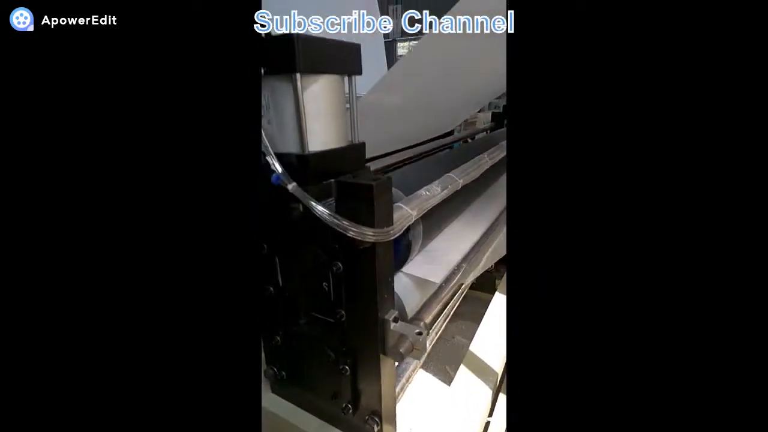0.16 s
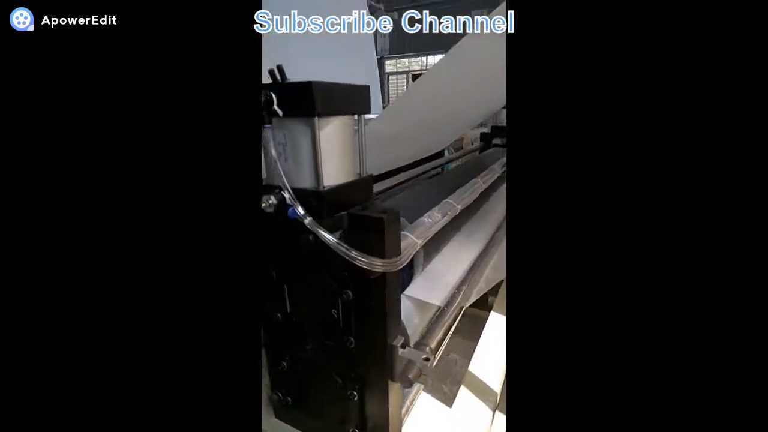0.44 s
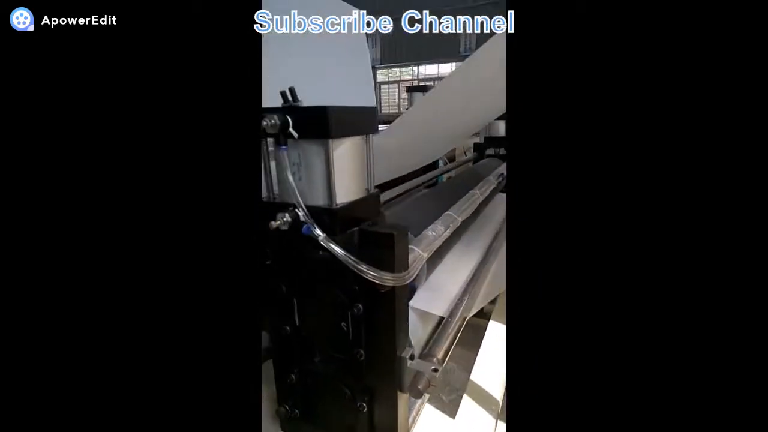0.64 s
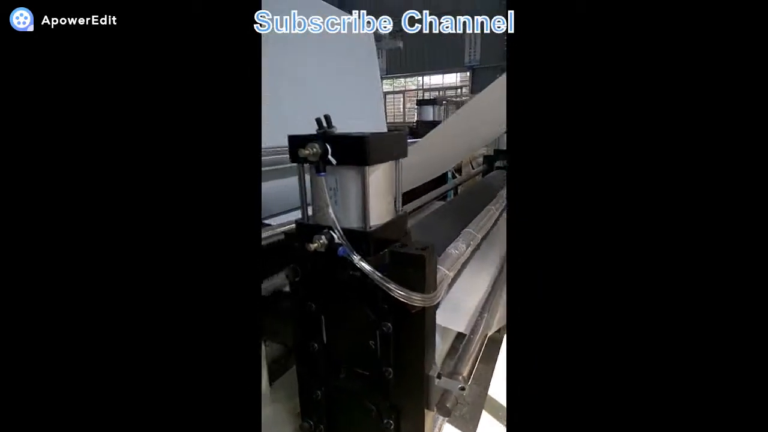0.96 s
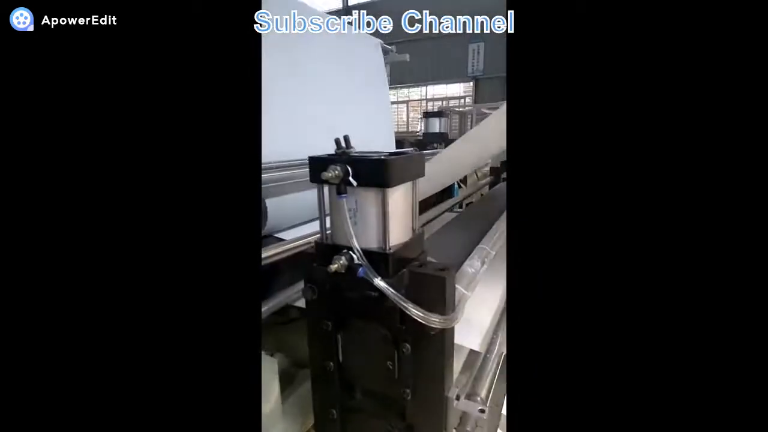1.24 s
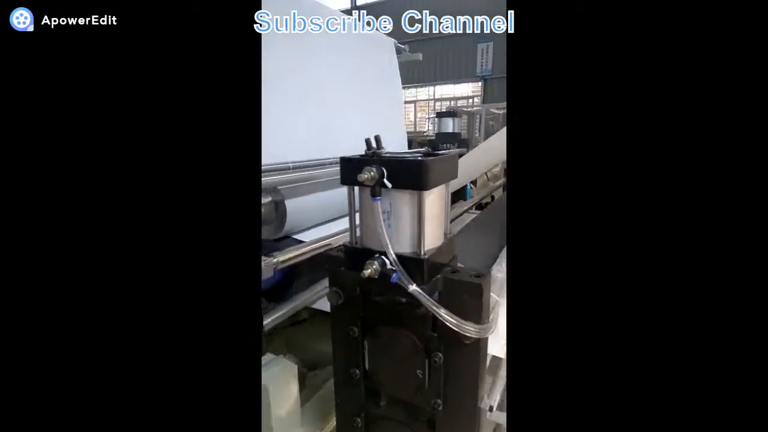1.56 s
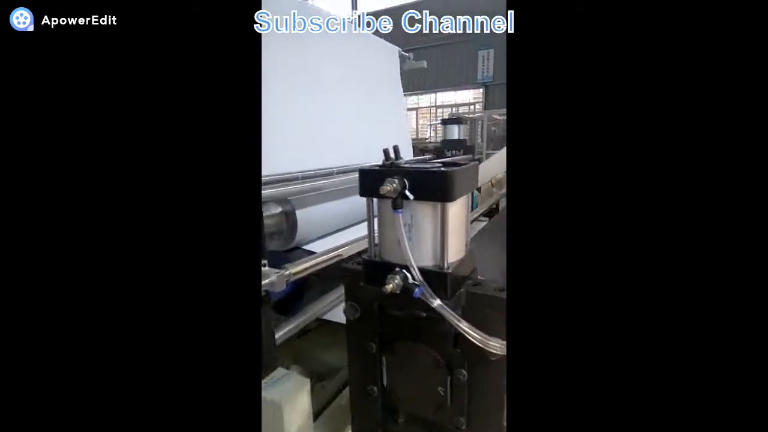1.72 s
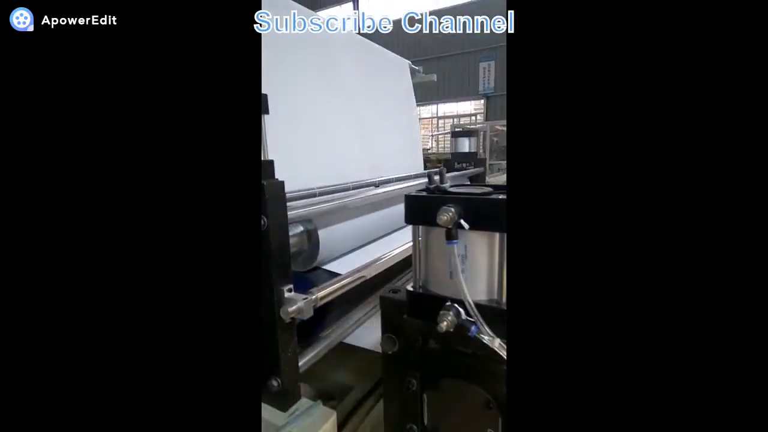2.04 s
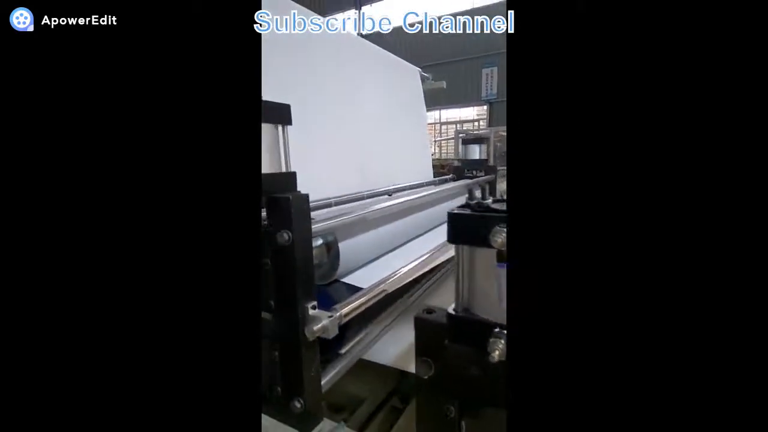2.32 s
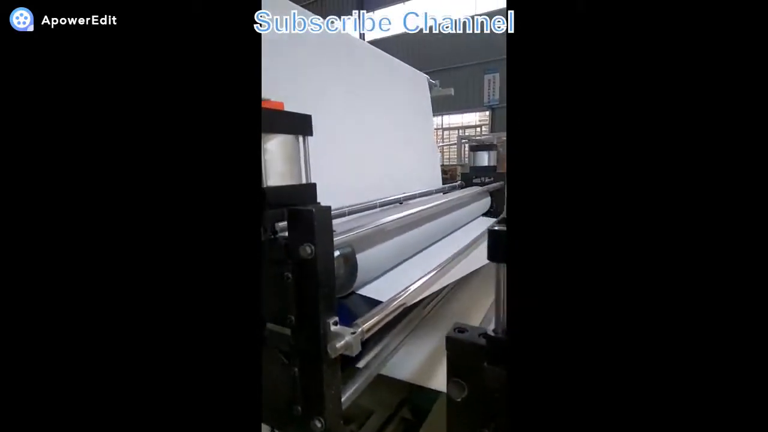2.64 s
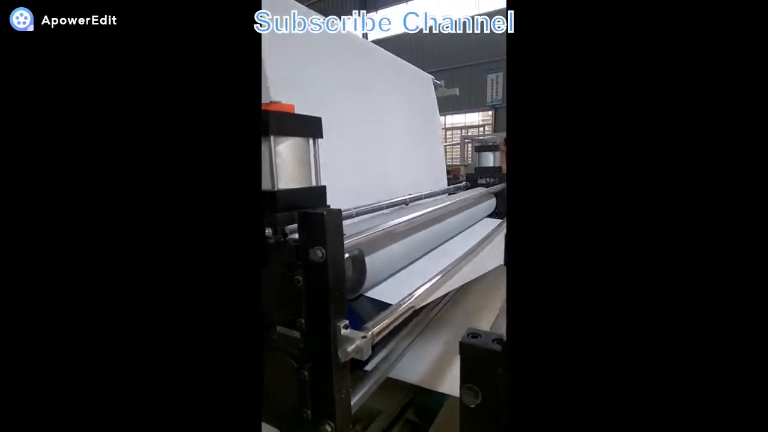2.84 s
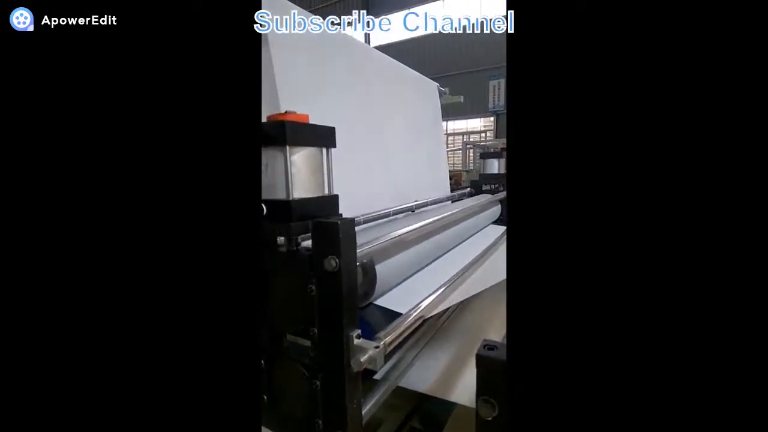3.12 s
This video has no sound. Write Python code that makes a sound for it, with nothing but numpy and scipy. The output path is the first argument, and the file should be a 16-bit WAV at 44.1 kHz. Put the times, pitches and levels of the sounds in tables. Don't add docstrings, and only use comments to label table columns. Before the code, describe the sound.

A tissue folding machine hammers out fast, even metallic clacks amid humming, rustling factory noise.

```python
import sys
import numpy as np
from scipy import signal
from scipy.io import wavfile
from scipy.ndimage import uniform_filter1d

SR = 44100
rng = np.random.default_rng(int(sys.argv[2]) if len(sys.argv) > 2 else 0)


def ratio(d):
    e = np.asarray(d, float) / 20
    return 10 ** e


def pcm_store(signal):
    levels = np.round(np.clip(np.atleast_2d(signal), -1, 1) * 32767)
    wavfile.write(sys.argv[1], SR, levels.astype(np.int16).T)


N = 144648

# frequency in Hz, level in dB per Hz.
RUMBLE_SPECTRUM = [(20, -25), (35, -4), (50, 2), (70, -3), (105, 27), (120, -34), (145, -41), (200, -46)]
# frequency in Hz, level in dB per Hz.
ROAR_SPECTRUM = [(140, 0.5), (180, -3), (255, 0), (310, -3.5), (370, -1.5), (520, -5), (660, -5),
                 (860, -9.5), (1400, -14)]
# time in seconds, gain in dB.
ROAR_WALK = [(0, 1.5), (.3, 2.1), (.8, 0.7), (1.3, 0.3), (1.6, -0.4), (2.0, 0.1), (2.5, 0), (2.9, -0.1),
             (3.28, 0.9)]
# frequency in Hz, likeness (1 is identical).
EAR_LIKENESS = [(60, 1), (180, 1.0), (550, 0.66), (1650, 0.022), (4970, 0.033), (15000, 0.4)]
# frequency in Hz, level in dB per Hz.
RUSTLE_SPECTRUM = [(1100, -7.5), (1400, -11.5), (2080, -2), (3650, -10.5), (7500, -9), (9500, -16.5),
                   (12000, -16.5), (15800, -26.5)]
# time in seconds, level in dB.
HUM_WALK = [(0, -12), (.15, -11.5), (.4, -11), (1.3, -9.5), (1.9, -9), (2.6, -9), (3.28, -9)]
# multiple of the shaft speed, level in dB against the hum, waver in dB.
BLOWER_ORDERS = [(1, -19, 1.5), (2, 0, .35), (4, -30, 3.0), (6, -35, 3.0), (7, -25, 2.5), (9, -27, 3.0),
                 (10.0, -32, 3.0)]
# frequency in Hz, level in dB, waver in dB.
MOTOR_TONES = [(80.2, -36, 3.0), (99.4, -30, 3.5), (182, -37, 5.0), (365, -41, 5.0), (520, -45, 5.0)]
# frequency in Hz, level in dB, waver in dB.
WHINE_LINES = [(7892.3, -44, 2.0), (7962.7, -45, 2.0), (8036.6, -49, 2.0), (8110, -49, 2.0)]
# time in seconds, gain in dB.
WHINE_WALK = [(0, -3), (.2, -4), (.3, 2.5), (1.3, 2.5), (1.7, 1), (1.9, -2), (2.2, .5), (2.45, -1),
              (2.6, 2.5), (2.95, 2.5), (3.05, -2), (3.28, -3)]
# time in seconds, level in dB.
GEAR_WALK = [(0, -38.5), (.9, -41.5), (1.15, -35), (1.3, -38.5), (1.8, -40), (1.97, -28.5), (2.2, -33.5),
             (2.4, -53), (3.28, -38)]
# frequency in Hz, level in dB per Hz.
PUFF_SPECTRUM = [(590, -44), (1000, -7), (1100, -9), (1420, -7.5), (5250, -3), (7340, -2), (12400, -14.5),
                 (16000, -21)]
# time in seconds, level in dB.
VALVE_FLOW = [
    (2.79, -41),
    (2.808, -21),
    (2.825, -16),
    (2.842, -15),
    (2.852, -16.5),
    (2.885, -19.5),
    (2.91, -19),
    (2.97, -27),
    (3.05, -34),
]
# frequency in Hz, level in dB per Hz.
STRIKE_SPECTRUM = [(600, -18.5), (1300, -6), (1800, 3.5), (3000, -3.5), (5500, -3.5), (7200, -5.5),
                   (12000, -15.5), (15000, -18.5)]
# ring in Hz, second ring in Hz, rebound in dB.
TUCKERS = [
    (2200, 2090, -1),
    (2400, 2280, 2),
    (2250, 2400, -.5),
]
# delay in seconds, crack in dB, ring in dB, time for the crack to fall 60 dB in seconds.
TUCK_HITS = [
    (0, -6, 0.5, .04),
    (.0105, -6, -.5, .05),
    (.047, -13, -8, .04),
]
# time in seconds, strength in dB, ring in dB.
TUCK_TIMES = [(0.0024, -15, -17), (0.1434, -21.5, -17), (0.2834, -14.5, -22), (0.4222, -16, -41),
              (0.565, -27, -22), (0.707, -11.5, -41), (0.8474, -14, -18), (0.9894, -17.5, -18),
              (1.1282, -17, -22), (1.2704, -14, -12), (1.4102, -23, -19), (1.5517, -12, -20),
              (1.6934, -11.5, -16), (1.8329, -23, -18), (1.972, -14.5, -16), (2.1154, -14, -17),
              (2.2546, -17, -19.5), (2.3954, -11.5, -19), (2.5384, -10, -16), (2.6789, -16.5, -15),
              (2.819, -31, -29), (2.961, -16, -15.5), (3.1001, -20.5, -16.5), (3.2406, -14.5, -22)]
# ring in Hz, second ring in Hz, rebound in dB.
ROLL_BLADES = [
    (1720, 1950, -3),
    (2030, 1880, -1),
    (1760, 2030, -2.5),
]
# delay in seconds, crack in dB, ring in dB, time for the crack to fall 60 dB in seconds.
CUT_HITS = [
    (0, 1.5, -4, .04),
    (.0055, -1.5, 0.1, .035),
    (.0205, -3, -1, .035),
]
# time in seconds, strength in dB, ring in dB, treble in dB.
CUT_TIMES = [(0.0653, -15.5, -33, 0.5), (0.2072, -13, -13, -2), (0.3474, -15.5, -15, 5),
             (0.4878, -13, -19, -1.5), (0.6313, -13, -13, 1.5), (0.7706, -12.5, -15, 1),
             (0.9115, -13, -18, 2.5), (1.0542, -11.5, -12.5, -2), (1.1912, -12.5, -17, 0.5),
             (1.3324, -9.5, -20, -2), (1.476, -12, -13.5, 0.1), (1.6156, -10, -18.5, 0.5),
             (1.7554, -10.5, -21, -1), (1.8969, -9.5, -13, 1.5), (2.0379, -12, -11, 0.5),
             (2.1789, -10, -32, 0.8), (2.3215, -8, -13.5, -1.5), (2.4611, -10.5, -16, 1.5),
             (2.601, -7.5, -31, 0.1), (2.7441, -9.5, -17.5, 1.5), (2.8864, -12, -14.5, -1),
             (3.0245, -8, -34, 1.3), (3.1653, -10, -17, 2)]
# frequency in Hz, threshold in dB against the usual power.
MUTE_LEVELS = [(3000, -14), (6000, -6), (7500, -3.2), (8600, -1), (10000, .2), (13000, -.3), (15000, .5),
               (16000, 2)]


def evened(x):
    return x / np.sqrt(np.mean(x ** 2) + 1e-20)


def read(points, hz):
    f, value = np.transpose(points)
    return np.interp(np.log(hz + 1), np.log(f + 1), value)


def curve(points):
    return np.interp(np.arange(N) / SR, *np.transpose(points))


def drift(rate):
    f = np.geomspace(rate / 12, rate, 20)[:, None]
    t = np.arange(0, N + 256, 256) / SR
    waves = np.sin(2 * np.pi * (f * t + rng.random((20, 1)))) / np.sqrt(f)
    return np.interp(np.arange(N) / SR, t, evened(waves.sum(0)))


def colour(x, points):
    hz = abs(np.fft.fftfreq(4096, 1 / SR))
    log_gain = np.log(ratio(np.maximum(read(points, hz), -80)))
    phase = -signal.hilbert(log_gain).imag
    taps = np.fft.ifft(np.exp(log_gain + 1j * phase)).real[:2048]
    return signal.oaconvolve(x, taps[None] / np.linalg.norm(taps), axes=1)[:, :x.shape[1]]


def noise(points, patchy_db, below_db=-40, above_db=-40):
    frames, hz = N // 256 + 5, np.fft.rfftfreq(2048, 1 / SR)
    a, b, c, d, patches = rng.standard_normal((frames // 2, 1025, 5)).T
    patches = uniform_filter1d(patches, size=16, axis=0)
    patches = evened(uniform_filter1d(patches, size=5, axis=1))
    same = np.clip(read(EAR_LIKENESS, hz), -1, 1)[:, None]
    left = a + 1j * b
    right = same * left + np.sqrt(1 - same ** 2) * (c + 1j * d)
    low_hz, high_hz = points[0][0], points[-1][0]
    skirt_db = below_db * np.log2(np.maximum(low_hz / (hz + 1), 1))
    skirt_db = skirt_db + above_db * np.log2(np.maximum(hz / high_hz, 1))
    level_db = (read(points, hz) + skirt_db)[:, None] + patchy_db * patches
    z = np.array([left, right]) * ratio(level_db)
    return evened(signal.istft(z, nperseg=2048, noverlap=1536)[1][:, :N])


def tone(hz, db, waver_db, rate, lead):
    turn = 2 * np.pi * (hz * np.arange(N) / SR + rng.random())
    return np.sqrt(2) * ratio(db + waver_db * drift(rate)) * np.sin([turn - lead, turn + lead])


def hall_roar():
    roar = ratio(-22 + curve(ROAR_WALK)) * noise(ROAR_SPECTRUM, 1.08, below_db=-41, above_db=-12)
    return roar + ratio(-26.5) * noise(RUMBLE_SPECTRUM, 3.9)


def paper_rustle():
    cycle_s, slack_s, slack_width_s, slack_db = .14091, .113, .018, -3.5
    off = (np.arange(N) / SR - slack_s + cycle_s / 2) % cycle_s - cycle_s / 2
    level_db = -24 + slack_db * np.exp(-(off / slack_width_s) ** 2)
    return ratio(level_db) * noise(RUSTLE_SPECTRUM, 2.7, below_db=-68)


def blower():
    shaft_hz = 62.95
    hum = sum(tone(k * shaft_hz, db, waver, 6.0, -.024 * k) for k, db, waver in BLOWER_ORDERS)
    return hum * ratio(curve(HUM_WALK)) * ratio([[-.4], [.4]])


def motors():
    low = sum(tone(hz, db, waver, 4.87, .015) for hz, db, waver in MOTOR_TONES)
    gear = tone(658, 0, 5.3, 14.0, .1) * ratio(curve(GEAR_WALK))
    whine = sum(tone(hz, db + 1.8, waver + 1.8, 45.0, .45) for hz, db, waver in WHINE_LINES)
    whine = whine * ratio(curve(WHINE_WALK) + [[1.2], [-1.2]])
    return whine + gear + low


def valve_puff():
    sputter_db = 1 * drift(220.0)
    return ratio(curve(VALVE_FLOW) + sputter_db) * noise(PUFF_SPECTRUM, 1.5, below_db=-7)


def blows(events, parts, contacts, rise_s, t60, ring_t60, crack_db, ring_db, body_db):
    t, out = np.arange(5000) / SR, np.zeros((2, N + 5000))
    repeat_share = .3
    own = rng.standard_normal((len(parts), 2, len(t)))
    treble = signal.butter(2, 4630, "high", fs=SR)
    dull = signal.butter(2, 5000, fs=SR)
    for k, (s, db, knock_db, *treble_db) in enumerate(events):
        part = k % len(parts)
        hz, second_hz, rebound_db = parts[part]
        r, fresh = rng.standard_normal(4), rng.standard_normal((2, len(t)))
        grit = np.sqrt(repeat_share) * own[part] + np.sqrt(1 - repeat_share) * fresh
        side = np.array([[0], [1.37 + r[2]]])
        crack = grit * np.minimum(t / .012, 1) * ratio(body_db - 60 * t / t60)
        ring = 0
        for n, (delay_s, hit_db, tone_db, snap_t60) in enumerate(contacts):
            u = np.maximum(t - delay_s * (1 + 0.0435 * r[0]), 0)
            rise = np.minimum(u / rise_s, 1) * ratio((n > 0) * (rebound_db + 1.5 * r[1]))
            snap = grit * rise * ratio(hit_db - 60 * u / snap_t60)
            if n == len(contacts) - 1:
                snap = signal.lfilter(*dull, snap)
            crack = crack + snap
            turn = 2 * np.pi * (1 + .017 * r[3]) * u
            steel = np.sin(hz * turn + side) + np.sin(second_hz * turn + side)
            ring = ring + rise * ratio(tone_db - 60 * u / ring_t60) * steel
        crack = crack + (ratio(sum(treble_db)) - 1) * signal.filtfilt(*treble, crack)
        at = max(round((s - rise_s / 2) * SR), 0)
        blow = ratio(db + crack_db) * colour(crack, STRIKE_SPECTRUM) + ratio(knock_db + ring_db) * ring
        out[:, at:at + len(t)] += blow
    return out[:, :N]


def tucker_clacks():
    return blows(TUCK_TIMES, TUCKERS, TUCK_HITS, rise_s=.002, t60=.13, ring_t60=.035,
                 crack_db=-5.5, ring_db=1, body_db=-6.5)


def blade_cuts():
    return blows(CUT_TIMES, ROLL_BLADES, CUT_HITS, rise_s=.0022, t60=.13, ring_t60=.05,
                 crack_db=-4.5, ring_db=-2, body_db=-7.5)


def hall_echo(x):
    t = np.arange(SR // 2) / SR
    fade = ratio(-60 * t / 0.22) * np.minimum(t / 0.0028, 1)
    tail = rng.standard_normal((2, len(t))) * fade
    return ratio(-24) * signal.fftconvolve(x, tail / np.linalg.norm(tail[0]), axes=1)[:, :N]


def scene():
    hits = blade_cuts() + tucker_clacks()
    background = hall_roar() + paper_rustle() + blower() + motors()
    return background + valve_puff() + hits + hall_echo(hits)


def muted_treble(x):
    hz, _, z = signal.stft(x, SR, nperseg=1024, noverlap=768)
    power = uniform_filter1d((abs(z) ** 2).mean(0), size=4, axis=0)
    power = uniform_filter1d(power, size=7, axis=1)
    usual = uniform_filter1d(np.median(power, axis=1), size=15)[:, None]
    swell = uniform_filter1d(power / (usual + 1e-20), size=80, axis=0)
    usual = usual * swell ** .7
    strong = power > usual * ratio(2 * read(MUTE_LEVELS, hz))[:, None]
    keep = strong | (hz < 3000)[:, None]
    z = z * keep * (hz < 16050)[:, None]
    return signal.istft(z, SR, nperseg=1024, noverlap=768)[1][:, :N]


def top_cut(x):
    return signal.sosfilt(signal.butter(12, 16120, fs=SR, output="sos"), x)


def record(dry):
    ceiling = .93
    limited = ceiling * np.tanh((abs(dry) / ceiling) ** 4) ** (1 / 4) * np.sign(dry)
    finished = muted_treble(limited)
    return top_cut(finished)


dry = scene()
out = record(dry)
pcm_store(out)
```